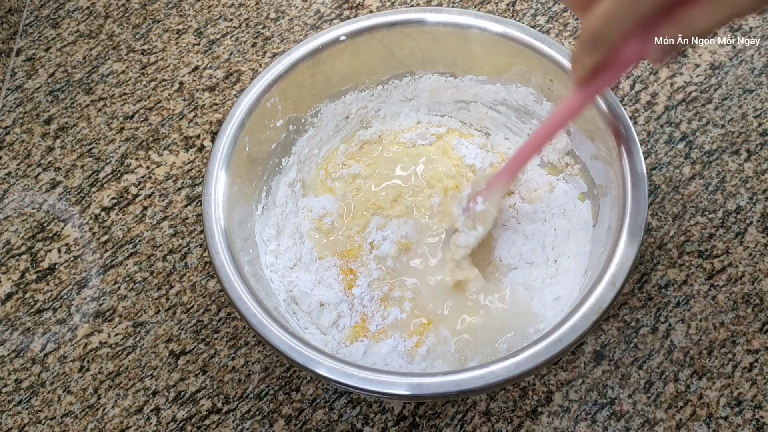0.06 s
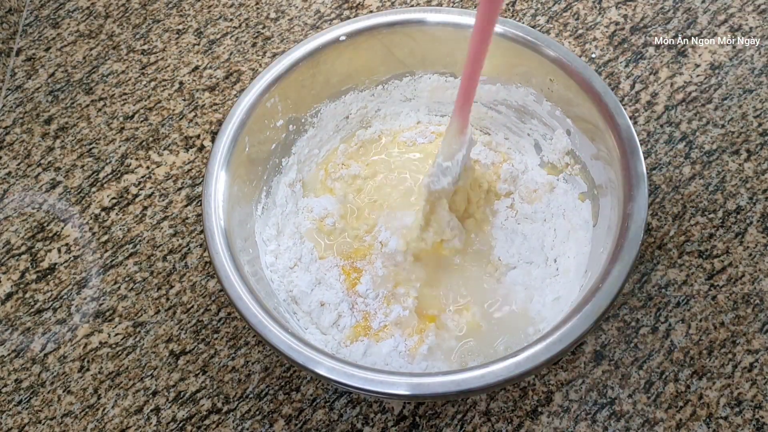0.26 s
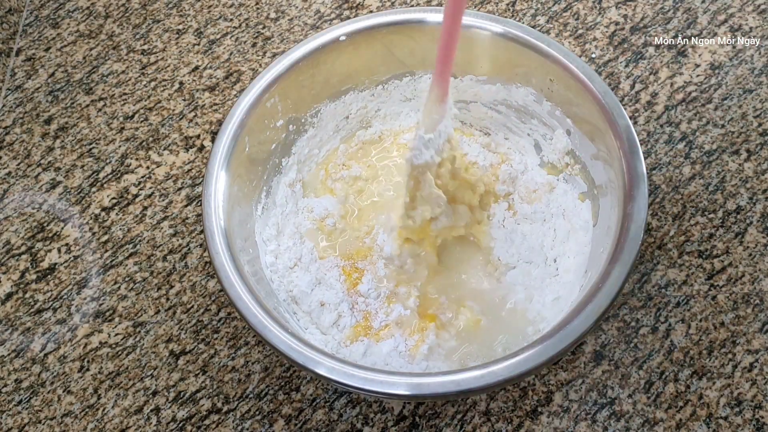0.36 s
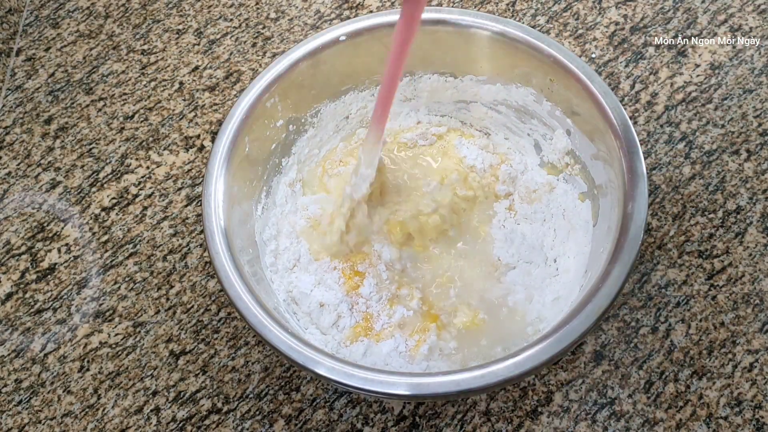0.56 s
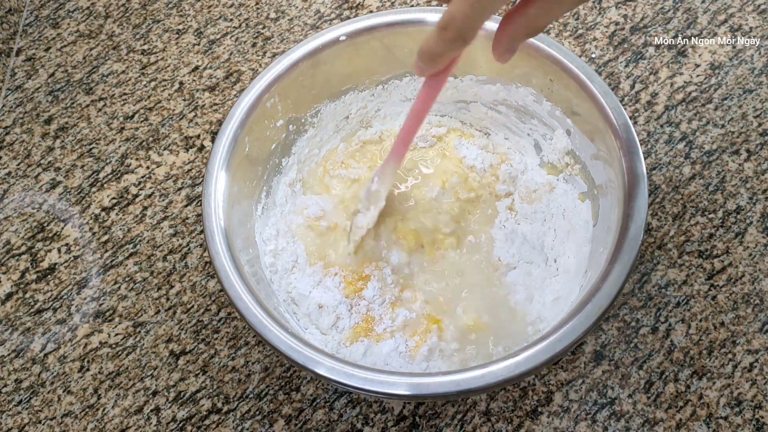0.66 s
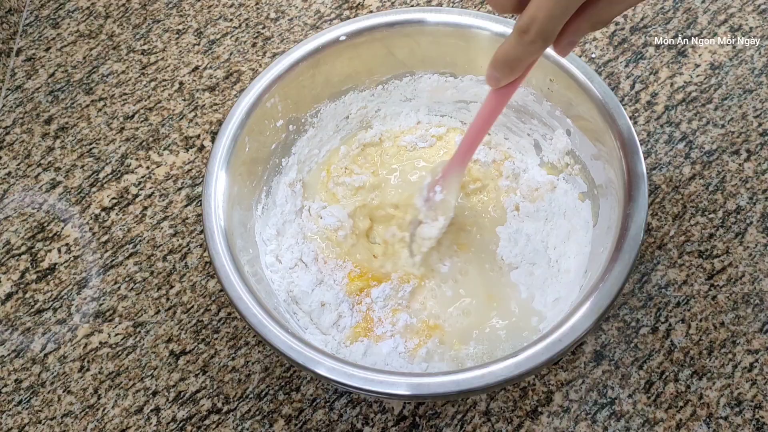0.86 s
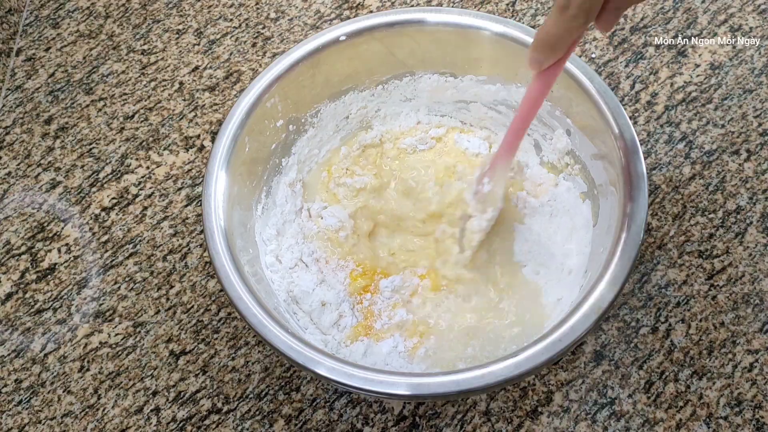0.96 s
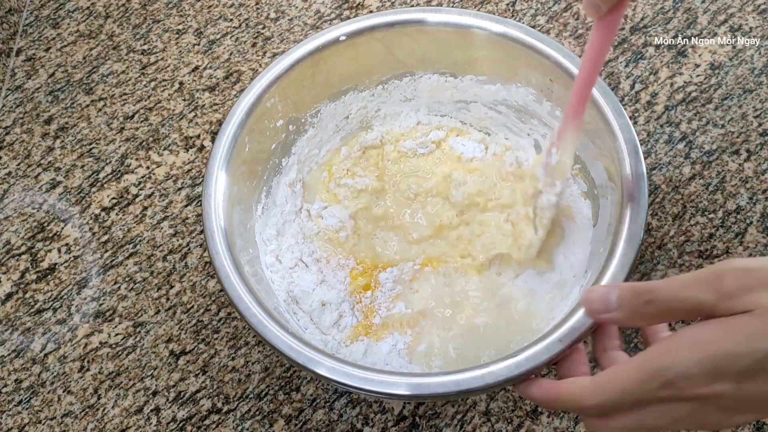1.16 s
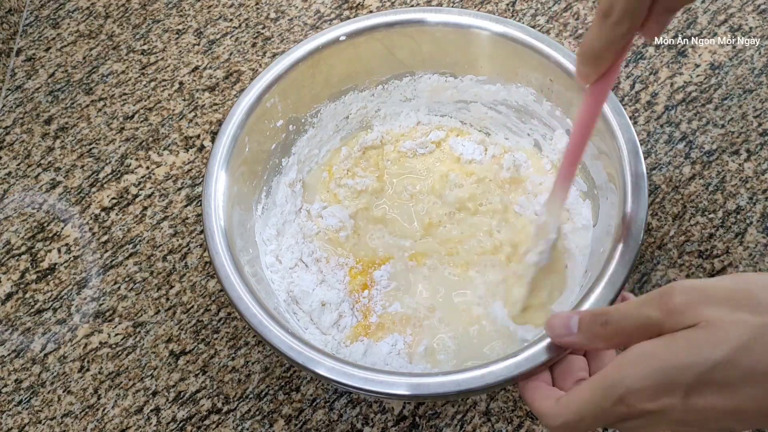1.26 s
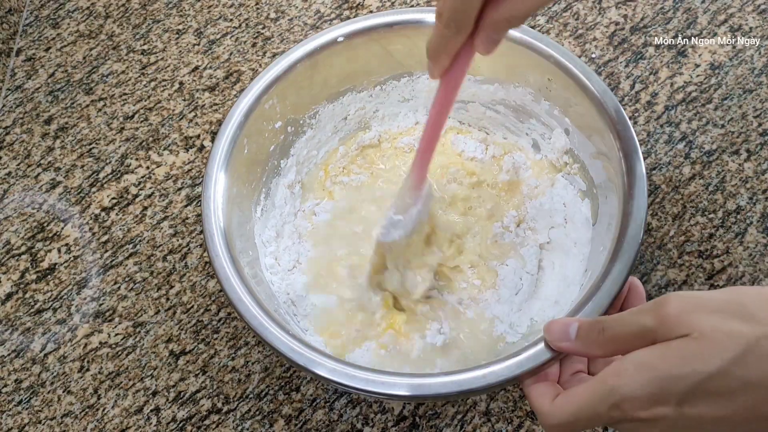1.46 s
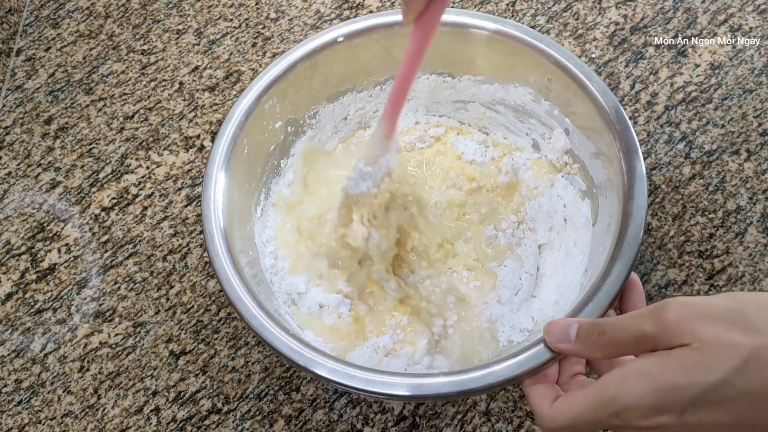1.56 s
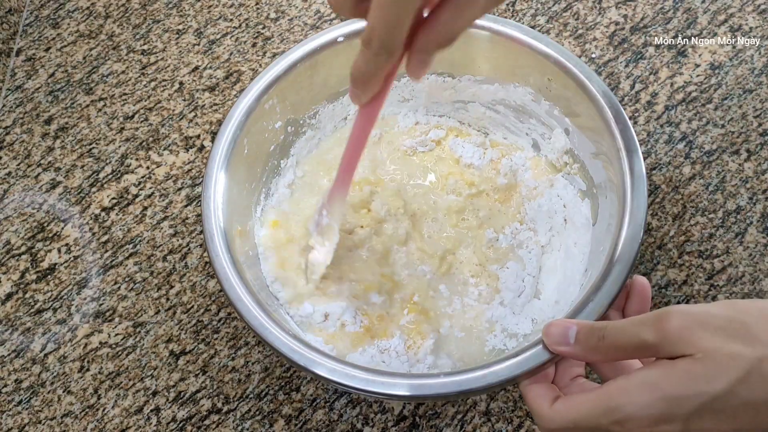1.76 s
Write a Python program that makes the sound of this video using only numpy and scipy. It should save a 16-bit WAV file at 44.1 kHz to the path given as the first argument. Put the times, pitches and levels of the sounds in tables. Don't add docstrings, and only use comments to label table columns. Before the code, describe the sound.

Steel bowl knocks with short, batter-damped rings, loudest before half a second, then a crisp spatula click, soft scraping, wet crackle and small popping bubbles; close stereo microphone, hard-walled kitchen, steady low hum.

```python
import sys
import numpy as np
from scipy import signal
from scipy.fft import rfft, irfft, next_fast_len
from scipy.io import wavfile
from scipy.ndimage import uniform_filter1d, map_coordinates

SR = 44100
rng = np.random.default_rng(int(sys.argv[2]) if len(sys.argv) > 2 else 0)


def how_loud(loudness_db):
    steps = np.asarray(loudness_db, float) / 20
    return 10 ** steps


def wav_out(sig):
    wavfile.write(sys.argv[1], SR, np.round(np.clip(np.atleast_2d(sig).T, -1, 1) * 32767).astype(np.int16))


N = 79380

# (time [s], level [dB], contact [s], brightness [dB per octave], rim pair [dB])
KNOCKS = [
    (.2325, -21, 0.0067, -5.5, -2.5),
    (.2545, -21, 0.0045, -8, -4.5),
    (.3455, -15, 0.014, -1, 1.5),
    (.4995, -15.5, 0.0071, 3, -7.5),
    (.6645, -37, 0.004, 6.5, -2),
]
# (frequency [Hz], level [dB], time
# to fall 60 dB [s])
BOWL_MODES = [(70, -36.5, 0.63), (294, -14, 0.042), (471, -10, 0.06), (580, -2.5, 0.043),
              (598.3, -3.5, 0.029), (686, -15.5, 0.083), (749, -16.5, 0.09), (922, -22.5, 0.025),
              (996, -14.5, 0.16), (1052, -1.5, 0.076), (1390, -13, 0.034), (1831, -10.5, 0.042),
              (3360, -36, 0.037), (3730, -35, .03)]
# (frequency [Hz], level [dB per Hz])
CRACK_COLOUR = [(250, -21), (450, -7), (800, 3), (1800, 0.5), (3300, -4.5), (6000, -12.5), (8000, -45),
                (15500, -60)]
# (centre time [s], level [dB], frequency [Hz], length [s])
ROCKS = [(.299, -36.5, 595, 0.016), (.376, -24, 596, 0.017), (.398, -30.5, 607, 0.012),
         (.414, -27, 599, 0.022), (.398, -29, 1040, 0.021), (.452, -27.5, 594, 0.028),
         (.456, -32.5, 1007, .02), (.486, -32, 1100, 0.011), (.539, -40, 1000, 0.019),
         (.549, -33, 620, 0.0037), (.564, -27.5, 596, 0.008), (.585, -35, 1027, 0.011),
         (.589, -28, 675, 0.0092), (.605, -25.5, 587, 0.018), (.63, -32.5, 580, 0.022),
         (.688, -34.5, 652, .016), (.691, -44.5, 994, 0.022), (.701, -36.5, 599, 0.0093),
         (.717, -38.5, 684, .02), (.734, -41.5, 992, .02), (0.759, -50, 617, 0.033),
         (0.796, -40.5, 596, 0.036), (.819, -41, 590, 0.0096), (.921, -43, 596, 0.018),
         (0.526, -40, 694, 0.045), (0.642, -38.5, 701, .025)]
# (time [s], level [dB], time to fall 60 dB [s], thump [dB], brightness [dB per octave])
SLAPS = [(.078, -44.5, 0.045, 2.5, 11), (.265, -50, 0.11, -15, 14.5), (0.633, -47, 0.034, -24, 28),
         (0.666, -51, .03, -16, 4), (.955, -52, 0.03, -15, 11), (0.7234, -25.5, 0.047, -2, 2.5),
         (.733, -34, 0.04, -12.5, 7), (1.298, -35.5, 0.1, -8, -2), (1.41, -36, 0.035, -19, -3),
         (1.427, -39, 0.061, 0, 5), (1.51, -58, 0.019, 12, -1), (1.566, -41.5, 0.062, -27, 17),
         (1.637, -46.5, .05, -7.5, 25), (1.68, -45, 0.045, -28, 9)]
# (frequency [Hz], level [dB per Hz])
SLAP_COLOUR = [(350, -19), (800, -18), (1400, 3), (2700, -1), (4700, 3), (6500, -6), (9000, -20),
               (15500, -43.5)]
# (time [s], level [dB], frequency [Hz], time to fall 60 dB [s])
TICKS = [(.2335, -31.5, 3730, 0.016), (.3465, -33.5, 3360, 0.023), (.5003, -28, 3320, 0.029),
         (0.4997, -37, 6000, 0.019), (0.5005, -49, 7160, 0.016), (.502, -36, 1690, 0.03),
         (.503, -51, 2030, 0.035), (.7237, -12.5, 4120, 0.0043), (0.7251, -24, 1640, 0.015),
         (0.7247, -15, 5190, 0.0054), (.7243, -31, 10370, 0.0056), (.7285, -23.5, 2260, 0.013),
         (.727, -43, 5940, 0.0038), (.7259, -16.5, 3260, .006), (0.7305, -27, 4200, 0.0041),
         (0.7355, -21, 2780, .006), (0.741, -31, 4240, .005), (.7488, -34, 5030, 0.0045),
         (.6645, -29, 3730, 0.016), (1.318, -44, 1990, 0.069), (1.4855, -37.5, 1320, 0.019),
         (1.3, -41, 2920, 0.0021), (1.299, -19, 5590, 0.0036), (1.299, -42, 1160, 0.066),
         (1.302, -53, 1410, .15), (1.306, -49.5, 1907, 0.26), (1.4118, -31, 5440, 0.0062),
         (1.4248, -29, 2500, 0.0046), (1.4315, -31, 5640, 0.007), (1.447, -33, 3800, 0.0088),
         (1.516, -30, 4250, 0.0079), (1.5685, -35, 6330, 0.0065), (1.5695, -49, 8800, 0.0073),
         (1.578, -37, 3800, .004), (1.602, -40, 6160, .006), (1.617, -47, 4200, .005),
         (1.638, -29, 4370, .004), (1.683, -28, 3900, .006)]
# (time [s], level [dB], frequency [Hz])
POPS = [(.310, -24, 3360), (0.316, -28.5, 1910), (0.456, -27, 3840), (0.478, -21, 3640), (.632, -29, 1970),
        (0.665, -21, 3610), (0.664, -27, 1780), (0.83, -22, 1990), (0.926, -31.5, 3700),
        (1.3025, -20.5, 4530), (1.482, -40, 1350), (1.534, -33, 2450), (1.575, -25, 2300),
        (1.593, -31, 2220), (1.628, -31.5, 2190), (1.64, -28.5, 2460), (1.775, -32.5, 1590)]
# (time [s], blade pressure [dB], wetness [dB], drag on the bowl [dB])
STROKE = [(0, -58.5, 3.5, -75), (0.202, -73.5, 3.5, -69), (.3, -54.5, -4, -60), (.46, -51.5, 0, -36.5),
          (.54, -51, -7.5, -50.5), (0.641, -50, 4.5, -48), (0.711, -54.5, -9, -47),
          (.84, -54.5, 0.5, -54.5), (.94, -48, -8, -58), (1.08, -56, -5.5, -55.5), (1.2, -47, -13.5, -75),
          (1.3, -49.5, -12, -79), (1.39, -57, -1, -59.5), (1.52, -45.5, -6.5, -73), (1.62, -48, -9, -95),
          (1.7, -50, -15.5, -99), (1.8, -47, -28, -79)]
# (frequency [Hz], level [dB per Hz])
SCRAPE_COLOUR = [(1500, -22.5), (2900, -31), (3300, -0.5), (4200, 4.5), (4700, -2.5), (4950, -28.5),
                 (9000, -37), (15500, -40)]
# (frequency [Hz], level [dB per Hz])
SLOSH_COLOUR = [(400, -61), (900, -1), (2200, -1), (5000, 2.5), (8000, -13.5), (12000, -16), (15500, -22)]
# (frequency [Hz], level [dB per Hz])
HUM_COLOUR = [(12, -29), (20, 0), (54, 6.5), (96, 0), (134, 0), (165, 11), (188, -0.5), (227, -13.5),
              (330, -24.5), (430, -44), (730, -120)]
# (frequency [Hz], level [dB per Hz])
AIR_COLOUR = [(150, -66), (250, -1), (593, -3), (742, -9), (1180, -6), (1990, -10.5), (6800, -15),
              (7500, -28), (15500, -57)]
# (frequency [Hz], left-right likeness [0-1])
HUM_ALIKE = [(30, 0.42), (80, 1), (200, 0.73)]
# (frequency [Hz], left-right likeness [0-1])
AIR_ALIKE = [(300, 0.39), (1500, 0.066), (6000, 0.14), (7500, 0.34)]
# (frequency [Hz], time to fall 60 dB [s])
KITCHEN_DECAY = [(250, 0.83), (470, 0.33), (600, 1), (720, 0.87), (1050, 0.33), (1600, 0.38), (4000, 0.22),
                 (12000, 0.16)]
# (frequency [Hz], expansion power [1])
THINNING = [(2500, 0), (4500, .35), (7000, 1.2), (12000, 1.6)]

KNOCK_LAG_S, KNOCK_PAN_DB, KNOCK_WET_DB = 0.00024, -3.5, -14.5
BLADE_LAG_S, BLADE_PAN_DB = -0.000094, 1
SLAP_WET_DB, POP_WET_DB = -8, -9.5


def unit(x):
    return x / np.sqrt(np.mean(x ** 2) + 1e-20)


def along(points, hz):
    f, v = np.transpose(points)
    return np.interp(np.log(hz + 1), np.log(f + 1), v)


def wobble(rate):
    return map_coordinates(rng.standard_normal(int(N * rate / SR) + 4), [np.arange(N) * rate / SR])


def filtered(x, response):
    m = next_fast_len(x.shape[-1] + 8192)
    return irfft(rfft(x, m) * response(np.fft.rfftfreq(m, 1 / SR)), m)[..., :x.shape[-1]]


def resonance(hz, centre_hz, width_hz):
    push = 1j * hz * width_hz
    return push / (centre_hz ** 2 - hz * hz + push)


def add(track, s, sound):
    part = track[round(s * SR):][:len(sound)]
    part += sound[:len(part)]


def rush(spectrum, alike, patchy_db):
    z = signal.stft(rng.standard_normal((2, N + 512)), nperseg=512)[2]
    field = uniform_filter1d(rng.standard_normal(z.shape[1:]), size=5, axis=0)
    field = uniform_filter1d(field, size=8, axis=1)
    pair = signal.istft(z * how_loud(patchy_db * unit(field)), nperseg=512)[1][:, :N]

    def mid_side(hz):
        turn = np.arccos(np.clip(along(alike, hz), -1, 1)) / 2
        return how_loud(along(spectrum, hz)) * [np.cos(turn), np.sin(turn)]

    mid, side = filtered(pair, mid_side)
    return unit(np.array([mid + side, mid - side]))


def placed(x, lag_s, pan_db, wet_db):
    side = np.array([[.5], [-.5]])
    scatter, scatter_s, scatter_from_hz = .62, (.00047, .0011), 1250
    treble_pan_db, wall_s = 1.5, .01

    def to_ports(hz):
        treble = 1 / (1 + (scatter_from_hz / (hz + 1)) ** 10)
        paths = 1
        for s in scatter_s:
            z = np.exp(-2j * np.pi * hz * s)
            paths = paths * (2 * side * scatter + z) / (1 + 2 * side * scatter * z)
        pan = how_loud((pan_db + treble * (treble_pan_db - pan_db)) * side)
        return pan * (1 + treble * (paths - 1)) * np.exp(-2j * np.pi * hz * lag_s * side)

    direct = filtered(x, to_ports)
    hz, t, z = signal.stft(rng.standard_normal((3, SR)), SR, nperseg=256)
    decay = how_loud(-60 * t / along(KITCHEN_DECAY, hz)[:, None])
    tail = signal.istft(z * decay, SR, nperseg=256)[1]
    tail = tail[:2] + 1.14 * tail[2]
    tail = tail * np.clip(np.arange(tail.shape[1]) / SR / wall_s, 0, 1) ** 2
    echo = signal.fftconvolve(x[None], tail / np.linalg.norm(tail[0]), axes=1)[:, :N]
    return direct + how_loud(wet_db) * echo


def kitchen():
    hum = how_loud(-52) * rush(HUM_COLOUR, HUM_ALIKE, patchy_db=.7)
    return hum + how_loud(-54.5) * rush(AIR_COLOUR, AIR_ALIKE, patchy_db=2.5)


def pops():
    out = np.zeros(N)
    cycles, glide = 5.4, 0.034
    for s, level_db, hz in POPS:
        u = np.arange(SR // 30) / SR * hz / cycles
        swell = (1 - np.exp(-8 * u)) * np.exp(-2.2 * u)
        add(out, s, how_loud(level_db) * swell * np.sin(2 * np.pi * cycles * u * (1 + glide * u)))
    return out


def stroke():
    crackles_per_s, spread_db, biggest, crackle_db = 500, 4, 2.2, -2.5
    s, press_db, wet_db, _ = np.transpose(STROKE)
    t = np.arange(N) / SR
    press = how_loud(np.interp(t, s, press_db))
    wet = how_loud(np.interp(t, s, wet_db))
    hiss = how_loud(wobble(25.1)) * rush(SCRAPE_COLOUR, [(5500, 0.033), (7500, .85)], patchy_db=1.5)
    burst = rng.random(N) < crackles_per_s / SR
    size = np.minimum(rng.exponential(size=N), biggest)
    specks = burst * how_loud(spread_db * size) * rng.standard_normal(N)
    crackle = unit(filtered(specks * how_loud(4.8 * wobble(9.5)), lambda f: how_loud(along(SLOSH_COLOUR, f))))
    slosh = how_loud(4.3 * wobble(13.77)) * rush(SLOSH_COLOUR, [(5500, 0.069), (7500, 0.97)], patchy_db=2.5)
    return press * (hiss + wet * slosh), press * wet * how_loud(crackle_db) * crackle


def ticks():
    out, t = np.zeros(N), np.arange(SR // 8) / SR
    rise = 1 - np.exp(-t / .00025)
    for s, level_db, hz, t60 in TICKS:
        add(out, s, how_loud(level_db - 60 * t / t60) * rise * np.sin(2 * np.pi * hz * t))
    return out


def slaps():
    out, t = np.zeros(N), np.arange(SR // 5) / SR
    thump_hz, thump_width_hz, spatter_db = 344, 600, 4
    rise = 1 - np.exp(-t / .0008)
    for s, level_db, t60, thump_db, tilt_db in SLAPS:
        a, b, c = rng.standard_normal((3, len(t)))
        rough = a * how_loud(spatter_db * unit(uniform_filter1d(c, size=40)))
        colour = lambda f: how_loud(along(SLAP_COLOUR, f) + tilt_db * np.log2(f / 4000 + .01))
        spatter = unit(filtered(rough, colour))
        thump = unit(filtered(b, lambda f: resonance(f, thump_hz, thump_width_hz)))
        add(out, s, how_loud(level_db - 60 * t / t60) * rise * (spatter + how_loud(thump_db) * thump))
    return out


def drag():
    width_hz, centre_hz, fall_db = 18, 675, 14.5
    s, db = np.transpose(STROKE)[[0, 3]]

    def body(f):
        return sum(how_loud(g - fall_db * abs(np.log2(c / centre_hz))) * resonance(f, c, width_hz)
                   for c, g, _ in BOWL_MODES)

    stutter = how_loud(3 * wobble(29.47)) * rng.standard_normal(N)
    return how_loud(np.interp(np.arange(N) / SR, s, db)) * unit(filtered(stutter, body))


def rocks():
    s, level_db, hz, length = np.transpose(ROCKS)[..., None]
    t = np.arange(N) / SR - s
    swell = np.exp(-(2 * t / length) ** 2)
    return np.sum(how_loud(level_db) * swell * np.sin(2 * np.pi * hz * t), axis=0)


def knocks():
    out, t = np.zeros(N), np.arange(SR // 4) / SR
    rise_s, crack_db, crack_t60, scatter_db, held_below_hz = 0.0014, -12, 0.039, 1, 1200
    hz, db, t60 = np.transpose(BOWL_MODES)[..., None]
    rim = (hz > 960) & (hz < 1150)
    for s, level_db, hold, tilt_db, rim_db in KNOCKS:
        tilt = tilt_db * np.log2(np.maximum(hz / 600, 1))
        gain_db = db + np.where(rim, rim_db, tilt) + scatter_db * rng.standard_normal(hz.shape)
        free_s = np.maximum(t - hold * (hz < held_below_hz), 0)
        ring = np.sum(how_loud(gain_db - 60 * free_s / t60) * np.sin(2 * np.pi * hz * t), axis=0)
        noise = unit(filtered(rng.standard_normal(len(t)), lambda f: how_loud(along(CRACK_COLOUR, f))))
        crack = how_loud(crack_db + 2 * tilt_db - 60 * t / crack_t60) * noise
        add(out, s, how_loud(level_db) * (ring * (1 - np.exp(-t / rise_s)) + crack))
    return out


def scene():
    hiss, crackle = stroke()
    bowl = placed(knocks() + drag() + rocks(), KNOCK_LAG_S, KNOCK_PAN_DB, KNOCK_WET_DB)
    blade = placed(slaps() + ticks() + crackle, BLADE_LAG_S, BLADE_PAN_DB, SLAP_WET_DB)
    batter = placed(pops(), BLADE_LAG_S, BLADE_PAN_DB, POP_WET_DB)
    return bowl + blade + batter + hiss + kitchen()


def thinned(x):
    hz, _, z = signal.stft(x, SR, nperseg=1024, noverlap=768)
    power = np.mean(np.abs(z) ** 2, axis=0) + 1e-20
    nearby = lambda p: uniform_filter1d(p, size=25, axis=0)
    cell = uniform_filter1d(uniform_filter1d(power, size=3, axis=0), size=5, axis=1)
    gain = np.abs(cell / nearby(cell)) ** np.clip(along(THINNING, hz), 0, 2)[:, None]
    gain = gain * np.sqrt(np.abs(nearby(power) / nearby(power * gain ** 2 + 1e-30)))
    return signal.istft(z * gain, SR, nperseg=1024, noverlap=768)[1][:, :N]


def band_limit(x):
    return signal.sosfilt(signal.butter(12, 15800, fs=SR, output="sos"), x)


def record(dry):
    top_hz = 15800
    mix = filtered(thinned(dry), lambda hz: hz < top_hz)
    return band_limit(mix)


dry = scene()
out = record(dry)
wav_out(out)
```